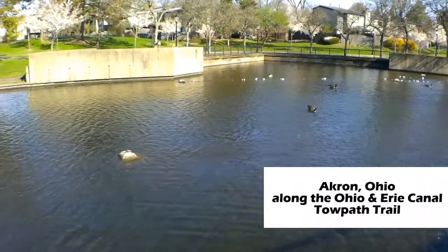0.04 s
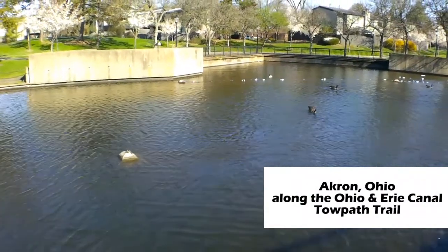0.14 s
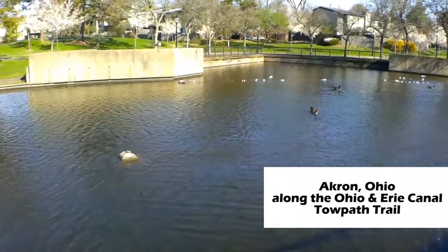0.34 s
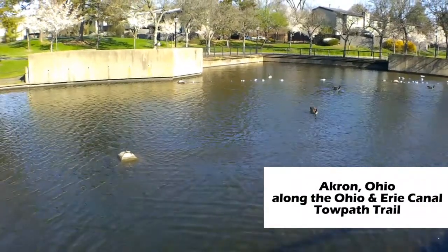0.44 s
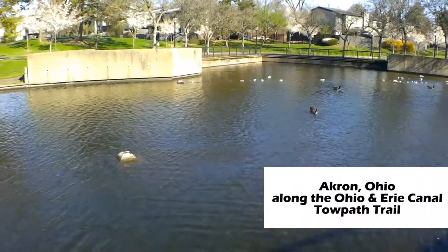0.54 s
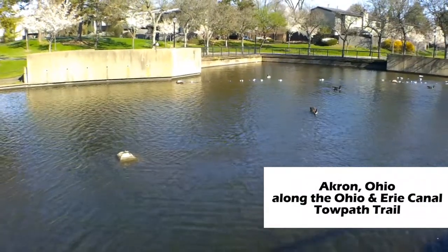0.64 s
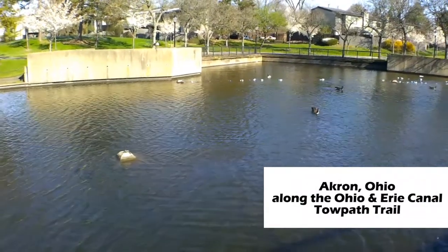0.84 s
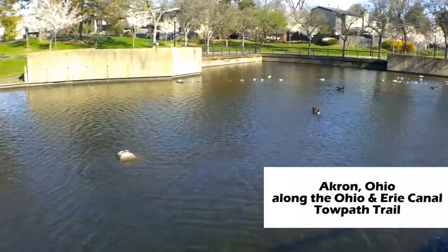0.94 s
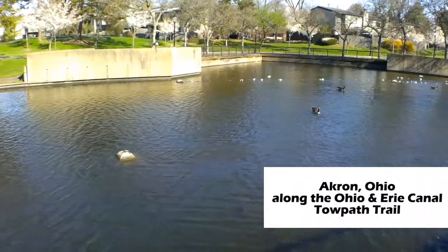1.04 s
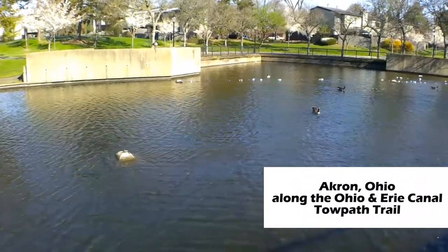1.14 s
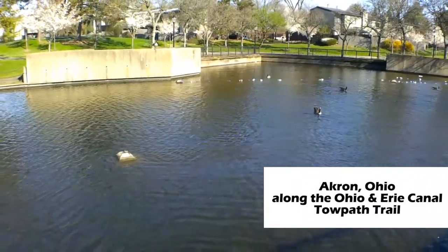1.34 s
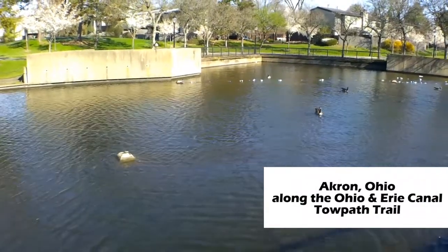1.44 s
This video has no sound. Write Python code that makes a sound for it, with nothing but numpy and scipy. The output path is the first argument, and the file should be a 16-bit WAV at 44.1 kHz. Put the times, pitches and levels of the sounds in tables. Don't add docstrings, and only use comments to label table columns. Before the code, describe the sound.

Two geese trade loud, short honks: one reedy and cracking upward from a low start, the other humming then snapping into a higher honk. Hard walls echo them; a small bird whistles faintly over soft wind.

```python
import sys
import numpy as np
from scipy import signal
from scipy.fft import rfft, irfft, next_fast_len
from scipy.io import wavfile
from scipy.ndimage import map_coordinates

SR = 44100
rng = np.random.default_rng(int(sys.argv[2]) if len(sys.argv) > 2 else 0)


def store_wav(level_fs):
    pcm = np.round(np.clip(np.atleast_2d(level_fs), -1, 1) * 32767)
    wavfile.write(sys.argv[1], SR, pcm.T.astype(np.int16))


def volts_from_decibels(level):
    exponent = np.asarray(level, float) / 20
    return 10 ** exponent


N = 66150
T = np.arange(N) / SR


def unit(x):
    return x / np.sqrt(np.mean(x ** 2) + 1e-20)


def along(points, hz):
    f, v = np.transpose(points)
    return np.interp(np.log(hz + 1), np.log(f + 1), v)


def wobble(knots_per_s, size=N):
    return map_coordinates(rng.standard_normal(1600), [np.arange(size) * knots_per_s / SR])


def coloured(x, points):
    m = next_fast_len(N + 8192)
    gain = volts_from_decibels(along(points, np.fft.rfftfreq(m, 1 / SR)))
    return irfft(rfft(x, m) * gain, m)[:N]


def noise(points):
    return unit(coloured(rng.standard_normal(N), points))


def humps(peaks, hz):
    return sum(db * np.exp(-((hz - c) / w) ** 2) for c, w, db in peaks)


# f/Hz, level/dB per Hz
AIR = [(88, -62), (150, -19.5), (346, -5), (920, -2.5), (1050, -5), (1380, -2), (1670, -20.5), (2600, -32),
       (3380, -75), (5720, -120)]
# f/Hz, level/dB per Hz
HISS = [(1470, -32), (2500, -2), (3550, -4.5), (15600, -5.5)]
# t/s, level/dB
LEAVES = [
    (0.0, -68.5),
    (0.94, -67.5),
    (1.5, -70.5),
]
# f/Hz, level/dB per Hz
RUMBLE = [(8.8, -33), (15, 4), (37, 0), (80, -5.5), (209, -18), (300, -32), (390, -63), (660, -120)]


def background():
    air_db, hiss_db, rumble_db, gusts_db = -45.5, 10, -47, 1.2
    air = noise([(90, -120), *AIR, (5000, -70)]) * volts_from_decibels(air_db + 0.36 * wobble(6.26))
    breeze_db = np.interp(T, *np.transpose(LEAVES))
    hiss = noise([(900, -40), *HISS]) * volts_from_decibels(hiss_db + breeze_db)
    rumble = noise([(8, -40), *RUMBLE, (600, -60)]) * volts_from_decibels(rumble_db + gusts_db * wobble(6.83))
    return air + hiss + rumble


# t/s, f/Hz, level/dB
WHISTLES = [
    [(0.367, 5080, -60), (0.389, 4870, -40.5), (0.403, 4840, -37.5), (0.419, 4668, -46), (0.426, 4700, -50)],
    [(0.461, 5400, -56), (0.465, 5400, -48), (0.481, 4980, -40), (0.493, 5050, -59), (0.505, 4960, -36),
     (0.517, 4600, -56)],
    [(0.552, 4900, -58), (0.56, 4820, -39.5), (0.572, 4720, -54), (0.588, 4818, -43.5), (0.594, 4771, -54),
     (0.602, 4563, -56), (0.609, 4500, -67)],
]
# t/s, length/s, from f/Hz, to f/Hz, level/dB
FLICKS = [
    (.424, .006, 4500, 7000, -53),
    (.451, .011, 7300, 9100, -55),
    (.515, .005, 4800, 6900, -52),
    (.524, .012, 6600, 6400, -61),
    (.538, .014, 6700, 9000, -57),
    (.603, .006, 6600, 8400, -56),
    (.61, .007, 7600, 10000, -62),
]


def songbird():
    second_s, second_db = .0045, -4
    out = np.zeros(N)
    for rows in WHISTLES:
        s, hz, db = np.transpose(rows)
        level = np.sqrt(2) * volts_from_decibels(np.interp(T, s, db, -120, -120))
        out += level * np.sin(2 * np.pi * np.cumsum(np.interp(T, s, hz)) / SR)
    for s, length, from_hz, to_hz, db in FLICKS:
        u = np.clip((T - s) / length, 0, 1)
        hz = (from_hz + (to_hz - from_hz) * u) * (1 + .03 * wobble(600))
        note = volts_from_decibels(db + 8) * np.sin(np.pi * u) * np.sin(2 * np.pi * np.cumsum(hz) / SR)
        out += note + volts_from_decibels(second_db) * np.roll(note, round(second_s * SR))
    return out * volts_from_decibels(2.2 * wobble(300))


# f/Hz, t60/s
POND = [(400, 1.8), (1300, 0.47), (2500, 1.01), (6000, 0.21)]
# f/Hz, level/dB
WALL = [(300, -19.5), (830, -4), (1080, -20), (1200, -9), (1350, 2.5), (1700, -3), (3500, -3.5), (8000, -8)]


def pond(x):
    pre_delay_samples = 900
    hz, t, z = signal.stft(rng.standard_normal(SR), SR, nperseg=256)
    decay = volts_from_decibels(-60 * t / along(POND, hz)[:, None])
    tail = signal.istft(z * decay, SR, nperseg=256)[1]
    late = np.pad(x, (pre_delay_samples, 0))
    return coloured(signal.fftconvolve(late, tail / np.linalg.norm(tail))[:N], WALL)


def bounce(x, taps, colour):
    smear_t60_s = .01
    t, answer = np.arange(800) / SR, np.zeros(SR // 3)
    for s, db in taps:
        smear = (t == 0) * 11 + rng.standard_normal(len(t)) * volts_from_decibels(-60 * t / smear_t60_s)
        answer[round(s * SR):][:len(t)] += volts_from_decibels(db) * unit(smear) / np.sqrt(len(t))
    return coloured(signal.fftconvolve(x, answer)[:N], colour)


# delay/s, level/dB
CLEAR_WALLS = [(.062, -7.5), (.118, -8), (0.201, -17.5)]
FLUTTER_WALLS = [(.057, -20.5), (.122, -17), (.146, -19)]
# f/Hz, level/dB
CLEAR_WALL = [(300, -2), (450, -11.5), (830, -6), (925, 1), (1080, -4.5), (1270, -0.5), (1400, -1.5),
              (3500, 1), (8000, -14.5)]


def walls(clear, flutter):
    return bounce(clear, CLEAR_WALLS, CLEAR_WALL) + bounce(flutter, FLUTTER_WALLS, WALL)


# f/Hz, level/dB
RASP = [(300, -22), (600, -12.5), (1200, 24), (2500, -5), (3600, -9), (12000, -27)]


def voice(base_hz, lines_db, level_db, jitter, shimmer_db, rasp_db):
    n = len(base_hz)
    base_hz = base_hz * (1 + jitter * wobble(140.8, size=n))
    phase = 2 * np.pi * np.cumsum(base_hz) / SR
    k = np.arange(1, 76)[:, None]
    f = k * base_hz
    gain = volts_from_decibels(lines_db(k, f)) * (f < 13000)

    fast = wobble(700, size=n) * (f > 4800)
    slow = np.array([wobble(90, size=n) for _ in range(5)])[k[:, 0] % 5]
    haze = 1 + .55 * np.clip(f / 2000 - 1.7, .25, 1) * (f > 1900) * (fast + slow)

    lines = gain * haze * np.cos(k * phase + 0.1213 * np.minimum(k, 12) ** 2)
    tone = lines.sum(0) / np.sqrt((gain ** 2).sum(0) / 2)
    breath = noise(RASP)[:n] * 2.9 * np.cos(phase / 2) ** 2
    return volts_from_decibels(level_db + shimmer_db * wobble(107, size=n)) * (tone + volts_from_decibels(rasp_db) * breath)


# f/Hz, level/dB
LEAD_THROAT = [(300, -9), (600, -2.5), (900, -2), (1220, 8), (1550, -1.5), (1850, -35), (3500, -29),
               (10000, -70)]
HONK_THROAT = [(300, -33), (500, -11.5), (670, 2), (1150, 9), (1330, 6.5), (1750, -17.5), (2040, -15.5),
               (2700, -29.5), (12000, -45)]
LEAD_SIDES_DB = [-26, -12.5, -10]
HONK_SIDES_DB = [-31, -30.5, -1.5]


def flipped(honk, lead, head, sag):
    flip, end, top_hz, db, snap_db = honk
    start, lead_hz, first_db, lead_rasp_db, last_db = lead
    sag_hz_per_s, sag_bend = sag
    flip_s, peak_s, stop_s = 0.0018, .006, .004
    fade_db, dulls_db, honk_rasp_db = -8, -4, -16
    sides_fade_hz, sides_fade_db, snap_t60_s = 3110, -11, 0.072

    out, on = np.zeros(N), (T >= start) & (T < end + stop_s)
    t = T[on]
    up = np.clip((t - flip) / flip_s + .5, 0, 1)
    gone = np.clip((t - flip) / (end - flip), 0, 2)
    honk_hz = top_hz - sag_hz_per_s * (end - flip) * gone ** sag_bend
    hz = (1 - up) * lead_hz + up * honk_hz
    level = db + np.interp(t, [start, start + 0.0027, flip - .003, flip + peak_s, end, end + stop_s],
                           [-40, first_db, last_db, 0, fade_db, -30])
    rasp_db = (1 - up) * lead_rasp_db + up * (honk_rasp_db - 2.5 * gone)

    def shape(throat, sides_db, k, f):
        return along(throat, f) + np.array([0, *sides_db])[k % 4]

    def treble(k, f):
        dulling = (f > 2500) * f / 3600 * dulls_db * gone
        return humps(head, f) + dulling + (k % 4 > 0) * sides_fade_db * (f > sides_fade_hz)

    def lines(k, f):
        hum = shape(LEAD_THROAT, LEAD_SIDES_DB, k, f)
        call = shape(HONK_THROAT, HONK_SIDES_DB, k, f) + treble(k, f)
        return (1 - up) * hum + up * call

    out[on] = voice(hz / 4, lines, level, jitter=0.0052, shimmer_db=1.13, rasp_db=rasp_db)

    after = np.clip(T - flip, 0, 1)
    puff_db = -60 * after / snap_t60_s - 13.4 * (after * top_hz / 4 % 1)
    puffs = np.clip(after / 0.0064, 0, 1) * volts_from_decibels(puff_db) * rng.standard_normal(N)
    f = np.geomspace(1500, 15000, 60)
    snap_colour_db = humps(head, f) - 5 * np.log2(f / 3000) - 12 * (f < 2800) - 14 * (f > 11600)
    return out + volts_from_decibels(db + snap_db) * coloured(puffs, np.c_[f, snap_colour_db])


# flip t/s, end t/s, top f/Hz, level/dB, snap level/dB
FLUTTER = [
    (0.205, 0.243, 675, -20.5, -38.5),
    (0.629, 0.676, 690.5, -19, -11.5),
    (0.959, 0.996, 684, -19, -29),
    (1.314, 1.357, 690.5, -20, -16.5),
]
# t/s, f/Hz, first level/dB, rasp level/dB, last level/dB
LEADS = [
    (.145, 604.3, -21, -16.5, -7.5),
    (.562, 614.8, -17.5, -10, -7.5),
    (.94, 607.1, -26, -1, -9.5),
    (1.255, 626.5, -19, -13.5, -5.5),
]
# f/Hz, width/Hz, level/dB
FLUTTER_HEAD = [(3440, 380, 13), (4190, 300, 15.7), (4800, 230, 9), (5740, 450, 17.4)]
# rate/Hz per s, bend
SAG = (1250, 1.73)


def flutter_goose():
    return sum(flipped(honk, lead, FLUTTER_HEAD, SAG) for honk, lead in zip(FLUTTER, LEADS))


# flip t/s, end t/s, top f/Hz, level/dB, snap level/dB
BREAK = (.927, .958, 642, -15, -8)
# t/s, f/Hz, first level/dB, rasp level/dB, last level/dB
BREAK_LEAD = (.92, 600, -22, -12, -8)
# f/Hz, width/Hz, level/dB
CLEAR_HEAD = [(2514, 168, -18), (3570, 290, 22.5), (4370, 170, 9), (5620, 1080, 14), (8200, 180, 7),
              (10600, 240, -2)]
# rate/Hz per s, bend
BREAK_SAG = (2150, 1.135)


def clear_goose_break():
    return volts_from_decibels(2.5) * flipped(BREAK, BREAK_LEAD, CLEAR_HEAD, BREAK_SAG)


# t/s, f/Hz, level/dB, half-pitch level/dB, gape/0-1
CLEAR_FADING = [(0, 401.4, -30, -1.5, 0.8), (0.046, 414.5, -34, -79, 0.69), (0.067, 397.1, -42, -20, 0.93),
                (.105, 413.4, -42, -30, 0.62), (.15, 414, -51, -10, 0.2)]
CLEAR = [
    [(.381, 406, -49, -1, 0.21), (.388, 398.5, -25.5, 10, 0.9), (.402, 415.3, -25, -55, 0.32),
     (.436, 420.8, -21.5, -65, 0.42), (.452, 429.8, -17.5, -60, 0.85), (.464, 417, -19.5, -32, 0.87),
     (.474, 424.5, -24.5, -20, 0.56), (.487, 425.6, -24.5, -7.5, 0.94), (.497, 374, -46, -19, 0.96)],
    [(.83, 405.3, -65, 24, 0.3), (.84, 413.6, -23.5, 10, 0.69), (.858, 415.4, -23, -52, 0.49),
     (.876, 425.5, -23, -63, 0.02), (.893, 426.2, -18.5, -15, 0.56), (.908, 455.4, -17.5, -48, 0.57),
     (.919, 466, -17.5, -14, 0.74), (.929, 467, -17.5, -5.5, 0.82), (.938, 465, -25.5, -34, 0.83)],
    [(1.477, 413, -49, 22, 0.27), (1.485, 406, -28.5, 13, 0.5), (1.492, 388, -30.5, -13, 0.33),
     (1.5, 408, -19.5, -39, 0.25)],
]
# f/Hz, level/dB
CLEAR_SHUT = [(200, -31.5), (420, 0.5), (850, 2), (1270, -13), (1700, -28.5), (2100, -15), (2550, -30),
              (12000, -56.5)]
# f/Hz, level/dB
CLEAR_GAPE = [(420, -10), (850, -3), (1270, 21), (1700, 15.5), (2100, -14.5), (2550, 8), (3700, -1.5),
              (7000, 5.5)]
# f/Hz, width/Hz, level/dB
CLEAR_HEADS = [
    [(2500, 390, 3), (3510, 410, 9.3), (5540, 1100, 3.4)],
    [(2570, 150, -5.5), (3010, 290, 5.5), (3740, 510, 5.5), (5500, 910, 11.5), (7000, 840, 5.5)],
    [(2450, 240, -13), (3500, 330, 13.5), (4300, 180, 12), (5760, 940, 10), (8100, 240, 1.5),
     (10500, 360, 4)],
    [(2540, 230, 1), (3500, 700, 12.5), (5000, 400, 4), (7070, 1250, 10.5), (10600, 610, 16)],
]
# t/s, level/dB
EFFORT = [(0, 10.5), (.06, -0.5), (.385, -2.5), (.44, -2.5), (.445, 2.5), (.458, 2), (.47, -5), (.5, -5),
          (.83, -2), (.89, 0), (.905, 3.5), (.94, -8), (1.48, 5.5)]


def clear_goose():
    head_rises, head_rest = 0.17, 0.39
    out = np.zeros(N)
    for rows, head in zip([CLEAR_FADING, *CLEAR], CLEAR_HEADS):
        s, *cols = np.transpose(rows)
        on = (T >= s[0]) & (T < s[-1])
        hz, db, half_db, gape = (np.interp(T[on], s, c) for c in cols)
        effort_db = np.interp(T[on], *np.transpose(EFFORT))

        def lines(k, f):
            throat = along(CLEAR_SHUT, f) + gape * along(CLEAR_GAPE, f)
            resonances = humps(head, f / (1 + head_rises * (gape - head_rest)))
            treble = resonances + effort_db * np.clip(f / 1500 - 1.5, 0, 1)
            return throat + treble + (k % 2) * half_db

        out[on] += voice(hz / 2, lines, db, jitter=.003, shimmer_db=0.56, rasp_db=-18 + 0.11 * half_db)
    return out


def scene():
    turned_away_db, pond_db = -4, -16
    clear, flutter, flip = clear_goose(), flutter_goose(), clear_goose_break()
    geese = clear + flutter + flip
    echoes = walls(clear + volts_from_decibels(turned_away_db) * flip, flutter) + volts_from_decibels(pond_db) * pond(geese)
    return (geese + echoes + songbird() + background())[None]


def band_limit(x):
    return signal.sosfilt(signal.butter(12, 15700, fs=SR, output="sos"), x)


def record(dry):
    return band_limit(dry)


dry = scene()
out = record(dry)
store_wav(out)
```